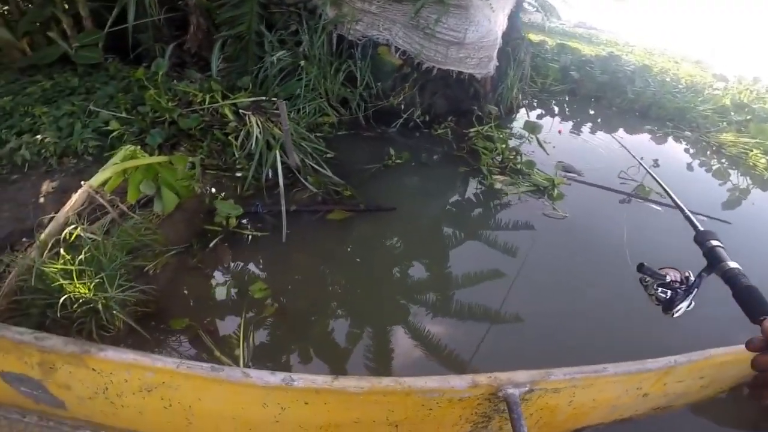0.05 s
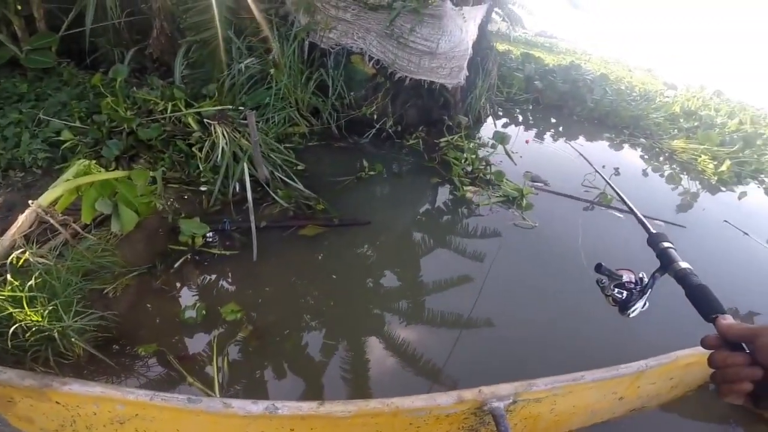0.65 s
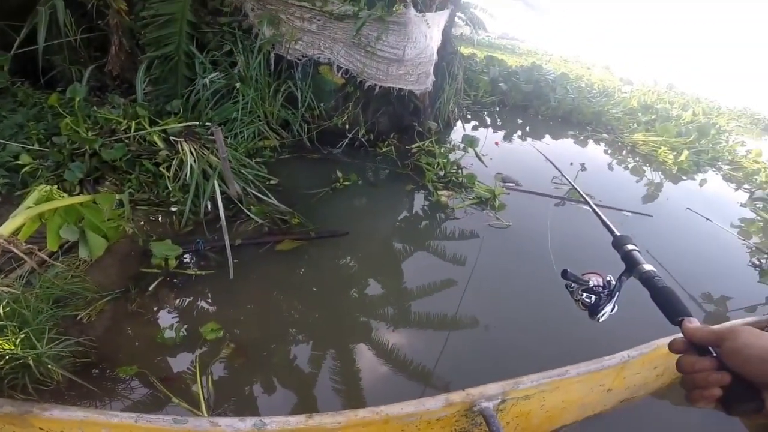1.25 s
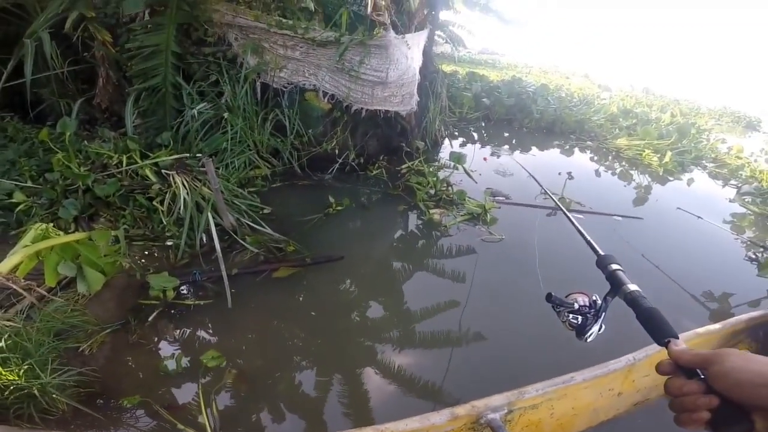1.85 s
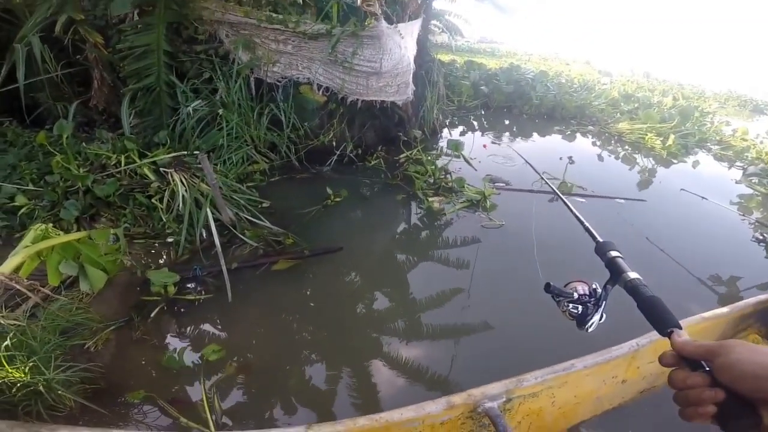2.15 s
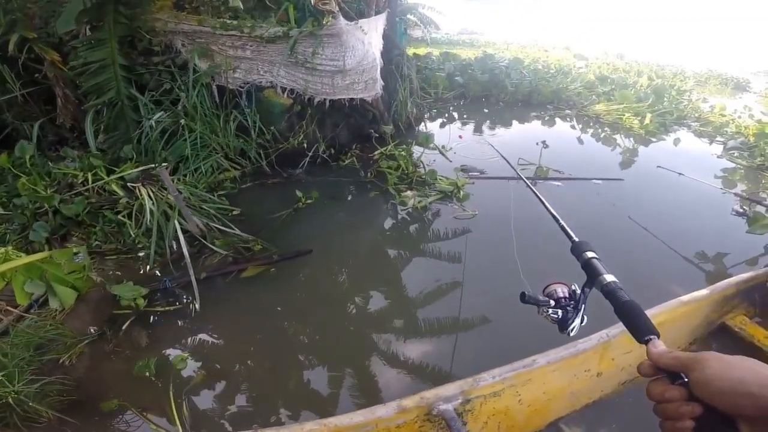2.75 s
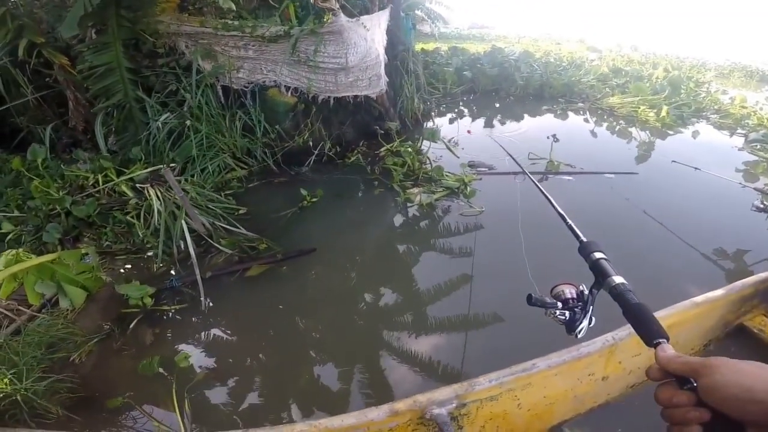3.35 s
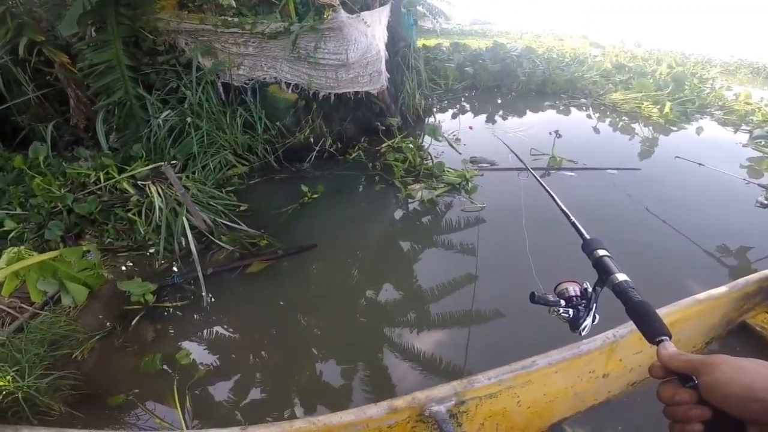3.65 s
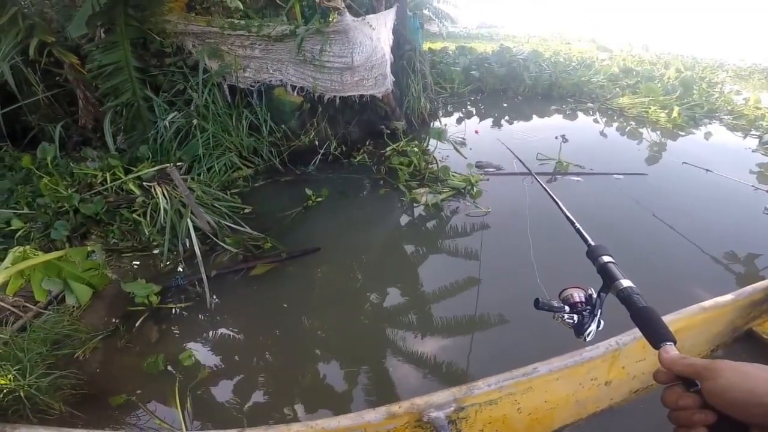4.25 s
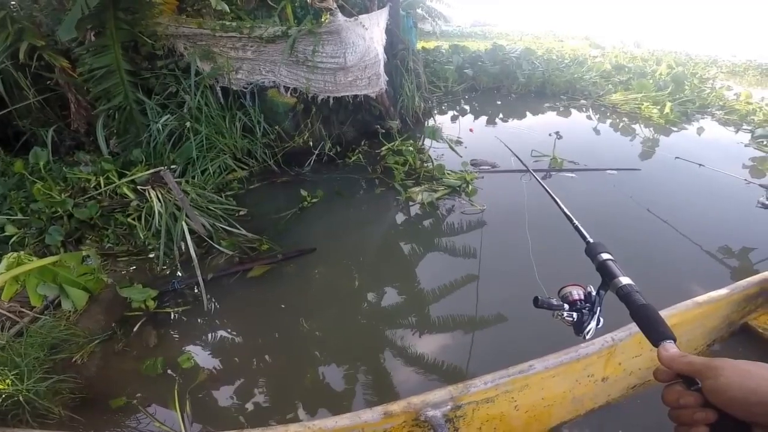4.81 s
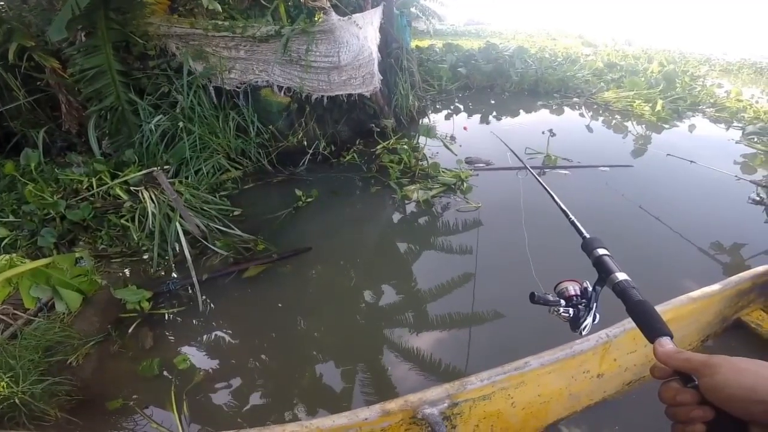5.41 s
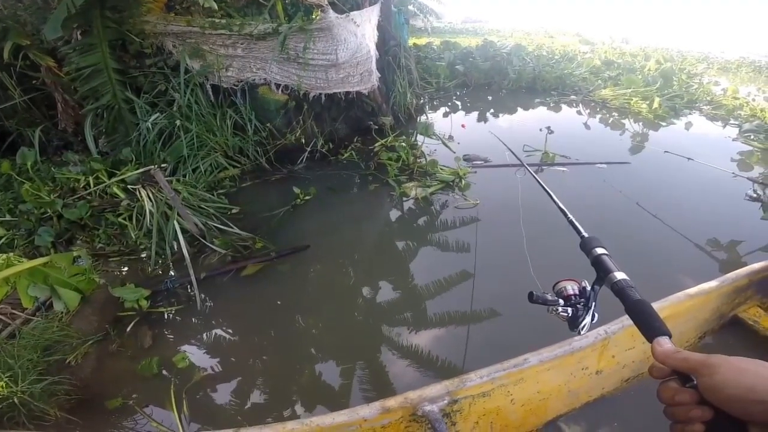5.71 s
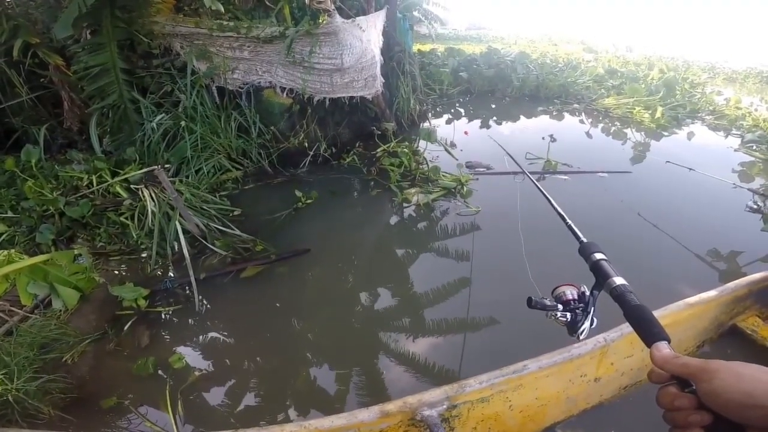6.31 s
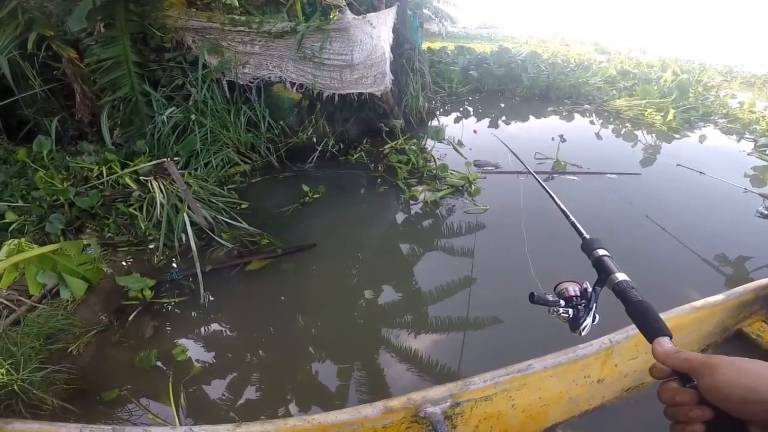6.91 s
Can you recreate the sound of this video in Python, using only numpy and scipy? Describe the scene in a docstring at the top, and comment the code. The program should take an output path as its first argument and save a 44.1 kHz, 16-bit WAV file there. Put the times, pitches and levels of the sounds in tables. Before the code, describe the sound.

A distant small engine chugs over still water, with soft close heartbeat-like thumps and two early knocks of fishing tackle.

```python
"""Distant engine from a canoe

A small engine chugs far off across still water: a throbbing exhaust hum, rough puffs, a light rattle.
Up close, soft paired thumps like a heartbeat come through the chest.
Near the start the fishing tackle knocks twice, then rubs and squeaks.
Behind it all lie a low hum, swells of rumble, open air, and a faint insect and bird in the reeds."""
import sys
import numpy as np
from scipy import signal
from scipy.fft import rfft, irfft
from scipy.io import wavfile
from scipy.ndimage import uniform_filter1d, map_coordinates

SR = 44100
rng = np.random.default_rng(int(sys.argv[2]) if len(sys.argv) > 2 else 0)


def store_pcm(level_fs):
    """Save levels as 16-bit WAV."""
    pcm = np.round(np.clip(level_fs, -1, 1) * 32767).astype(np.int16)
    wavfile.write(sys.argv[1], SR, np.atleast_2d(pcm).T)


N = 316197
T = np.arange(N) / SR

# engine firing rate: t/s, f/Hz
FIRING_RATE = [(0, 26.85), (.9, 26.75), (1.7, 26.92), (3.3, 26.88), (3.75, 26.75), (4.05, 26.85),
               (4.5, 26.72), (5.4, 26.93), (7.17, 26.87)]
# exhaust harmonics: multiple of the firing rate, level before/dB, level after/dB, halfway t/s
EXHAUST_ORDERS = [(4, -54, -38, 10), (5, -46.5, -71.5, 9.2), (6, -37, -32, 5.76), (7, -45, -46, 2.8),
                  (8, -51, -49, 3.4), (9, -43, -44.5, 3.8), (10, -43, -48.5, 5.1), (11, -47, -56.5, 5.2),
                  (12, -53, -57, 6.4), (13, -58, -51.5, 1.6), (14, -62, -56.5, 2.3), (15, -53.5, -50, 3.5),
                  (16, -57, -52.5, 1.6), (17, -60, -61.5, 3.6), (19, -55, -70.5, 5.55), (22, -68, -69, 8.2),
                  (35, -84, -69.5, 4), (38, -83, -83, 4), (39, -72, -73, 4), (44, -71.5, -75, 3.3),
                  (46, -70.5, -69, 4.6)]
# tone of the exhaust puffs: f/Hz, level/dB
PUFF_EQ = [(40, 3.5), (75, -4), (95, 1), (112, -2.5), (135, 1), (165, -1.5), (205, -13), (265, -11),
           (340, -29.5), (410, -29.5), (500, -22.5), (580, -41), (1200, -39.5), (3000, -49), (6000, -78)]
# tone of the slap that opens each throb: f/Hz, level/dB
SLAP_EQ = [(120, -11), (220, 3.5), (280, -2.5), (350, -4.5), (480, -11.5), (550, -21.5), (900, -50),
           (3000, -77)]
# resonances of the engine housing: f/Hz, width/Hz, level/dB
HOUSING_MODES = [(1046, 95, -75), (1683, 190, -63.5), (2125, 330, -64), (2730, 150, -77), (3010, 140, -72),
                 (3270, 400, -69.5)]
# fader ride on the housing rattle: t/s, level/dB
HOUSING_RIDE = [(0, 3.5), (.7, -0.5), (1.3, -1.5), (1.9, -1.5), (2.5, 2.5), (3, 0.5), (3.5, -0.5),
                (4.3, -1.5), (4.9, -2.5), (5.3, -0.5), (6.4, 0), (6.9, -1)]
# narrow metallic ring, as of a loose panel: f/Hz, width/Hz, relative level/dB
PANEL_MODES = [(1501, 36, -0.5), (1561, 63, 4), (1596, 52, -9)]
# fader ride on that ring: t/s, level/dB
PANEL_RIDE = [(0, -57), (.68, -56), (1.27, -63.5), (1.42, -57), (1.93, -62.5), (2.1, -57), (2.5, -61),
              (3.03, -56.5), (3.25, -62.5), (3.92, -57), (4.19, -65), (4.54, -53.5), (4.93, -62.5),
              (5.2, -56), (5.48, -60.5), (6.12, -62.5), (6.55, -65), (6.83, -57.5), (7.17, -61)]
# paired thumps: t/s, first level/dB, gap/s, second level/dB, second f/Hz
HEARTBEATS = [(0.417, -11.5, 0.17, -15, 41.2), (0.961, -9.5, 0.24, -16, 40.3), (1.547, -9, 0.24, -14, 46.3),
              (2.137, -7.5, 0.25, -14.5, 42), (2.718, -9.5, 0.26, -14.5, 48), (3.301, -11, 0.25, -14.5, 50),
              (3.875, -11.5, 0.23, -16.5, 48.5), (4.444, -15.5, 0.25, -14, 49.5),
              (5.05, -11, .243, -16.5, 53), (5.685, -12.5, 0.242, -17, 56.3), (6.367, -14, 0.23, -17, 50),
              (7.068, -13.5, .24, -30, 50)]
# chest-worn gear swaying against the body: t/s, level/dB, f/Hz
GEAR_SWAYS = [(0.091, -22.5, 5.6), (0.171, -10, 27.8), (0.226, -7, 29.6), (0.301, -14, 13.4),
              (0.37, -19, 35), (2.206, -14.5, 17.3), (2.268, -20.5, 31)]
# impacts within the tackle knocks: t/s, thud level/dB, thud f/Hz, crack level/dB, ring level/dB
TACKLE_HITS = [(0.113, -18.5, 196, -38, -64), (0.1808, -14.5, 293, -22, -32), (0.1833, -14, 340, -35, -41),
               (0.1901, -7, 152, -50, -28), (0.196, -8, 130, -35, -22), (0.633, -16.5, 141, -47, -42),
               (.958, -38, 200, -38, -45)]
# tone of a knock's crack: f/Hz, level/dB
CRACK_EQ = [(100, -8), (380, 13), (700, -5.5), (1500, -13.5), (3400, -15), (4200, -46), (8000, -43),
            (14000, -60)]
# resonances of struck or rubbed tackle: f/Hz, width/Hz, relative level/dB
TACKLE_MODES = [(1630, 330, 10), (1900, 220, -10), (3180, 340, -19), (4520, 400, -13), (6500, 900, -14.5),
                (7780, 500, -16)]
# dull brushes that swell and stop short: peak t/s, level/dB
TACKLE_BRUSHES = [(0.118, -39.5), (0.182, -28)]
# small ticks of the tackle: t/s, f/Hz, width/Hz, level/dB, decay/s
TACKLE_TICKS = [(0.112, 2700, 450, -44, 0.0067), (0.1799, 3200, 696, -34.5, 0.004),
                (0.1963, 3770, 2600, -47, 0.00098)]
# partials of the squeak: ratio to the pitch, relative level/dB
SQUEAK_PARTIALS = [(0.999, -7), (1.982, -25), (2.85, -26.5), (4.0, -29.5)]
# swells of low rumble: peak t/s, half length/s, f/Hz, width/Hz, level/dB
RUMBLE_SWELLS = [(3.2, 1, 143.8, 28, -37), (4.754, 0.38, 88.7, 20, -35)]
# tone of the open air and hiss: f/Hz, level/dB
AIR_EQ = [(12, -0.5), (45, -3.5), (130, -4.5), (230, -18), (450, -28), (650, -33.5), (1220, -38.5),
          (1380, -39), (1900, -40.5), (2500, -46.5), (3400, -46), (4000, -49), (5200, -51.5), (5900, -49.5),
          (11000, -49.5), (15000, -60)]
# bird notes: t/s, length/s, top f/Hz, level/dB
BIRD_NOTES = [(4.347, 0.13, 4710, -68), (5.99, 0.12, 4620, -65)]


def engine(throb_hz=23.9, depth=0.36, snap=0.28):
    """The chug: a throb a little slower than the firing pumps the exhaust and rattle over a rising drone."""
    firing_hz, = curves(FIRING_RATE)
    firings = np.cumsum(firing_hz) / SR + 0.0021 * drift(per_s=20)
    throbs = throb_hz * (T - 0.035) + 0.034 * drift(per_s=3)
    swell = 1 + depth * (np.cos(2 * np.pi * throbs) - snap * np.sin(4 * np.pi * throbs))
    drone_gain = amp(-38 + 2 * drift(per_s=5)) * np.sqrt(2 * T / T[-1])
    drone = drone_gain * np.cos(2 * np.pi * 4 * throbs)
    return exhaust_hum(firings, swell) + drone + exhaust_puffs(throbs) + clatter(firings, swell)


def exhaust_hum(firings, swell, waver_db=1.52, scatter_rad=0.79, wander_rad=0.34):
    """Harmonics of the firing, each sliding to a new level on its own path over the water."""
    hum = np.zeros(N)
    for order, *levels in EXHAUST_ORDERS:
        level = slide(*levels)
        if order == 6:  # the main boom dips once
            level -= 8 * np.exp(-((T - 4.52) / 0.37) ** 2)
        phase = 2 * np.pi * order * firings + np.pi / 2 * (order % 2)  # the offset gives two blows a cycle
        phase += scatter_rad * rng.standard_normal() + wander_rad * drift(per_s=5)
        unrest = min(1, 9 / order) ** 2  # the upper orders hold steadiest
        level += unrest * waver_db * drift(per_s=4.1)
        hum += np.sqrt(2) * amp(level) * np.cos(phase)
    bass = signal.sosfiltfilt(signal.butter(4, 200, fs=SR, output="sos"), hum)
    return bass * (1 + swell) / 2 + (hum - bass) * swell  # the bass throbs half as deep


def exhaust_puffs(throbs):
    """Each throb opens with a sharp slap, then a rough puff; both ease off midway."""
    rough = amp(-35) * colour(puffs(throbs + 0.09, decay_cycles=1, floor=1), PUFF_EQ)
    slaps = puffs(throbs + 0.3, decay_cycles=0.22, floor=0.03)
    slaps *= amp(1.5 * drift(per_s=23.9))  # no two slaps hit alike
    return (rough + amp(-43.5) * colour(slaps, SLAP_EQ)) * amp(slide(0.82, -3.7, halfway_s=4.2))


def clatter(firings, swell, follow=0.22):
    """The firings rattle the housing, which partly follows a metallic ring as it swells and sinks."""
    def shake(modes):
        """Each mode is rattled twice a firing and wavers on its own."""
        out = np.zeros(N)
        for hz, width, db in modes:
            gain = amp(db + 1.2 * drift(per_s=11))
            drive = puffs(2 * firings, decay_cycles=0.87, floor=0.82) * (4 + swell)
            out += gain * resonate(drive, [(hz, width, 0)])
        return out

    panel_db, = curves(PANEL_RIDE)
    housing_db, = curves(HOUSING_RIDE)
    housing = amp(housing_db + follow * (panel_db - panel_db.mean())) * shake(HOUSING_MODES)
    return housing + amp(panel_db) * unit(shake(PANEL_MODES))


def body(octaves_per_db=0.2369):
    """Heartbeat-like thumps and sways of gear at the chest, with a soft flutter of cloth under each."""
    thumps = np.zeros(N)
    for s, db, gap, second_db, second_hz in HEARTBEATS:
        first_hz = 32.2 * 2 ** (octaves_per_db * (db + 10.5))  # a stronger thump is quicker
        thumps += thump(s - 0.049, db - 13, hz=19, cycles=0.12)  # lead-in
        thumps += thump(s - 0.0223, db - 11.5, hz=66, cycles=0.75)  # quick catch
        thumps += thump(s, db - 1, first_hz, cycles=0.48)  # lub
        thumps += thump(s + 0.0493, db - 8, hz=18, cycles=0.39)  # rebound
        thumps += thump(s + gap, second_db + 5, second_hz, cycles=0.46, wave=np.sin, slowing=0.27)  # dub
    for s, db, hz in GEAR_SWAYS:
        thumps += thump(s, db, hz, cycles=1)
    pressure = np.sqrt(abs(uniform_filter1d(thumps ** 2, size=2000)))
    cloth = colour(noise(), [(20, 9.5), (85, 15.5), (140, -19), (300, -12), (900, -68)])
    return thumps + amp(-13) * pressure * cloth


def thump(s, db, hz, cycles, wave=np.cos, slowing=0):
    """A brief, uneven low push and its recoil, centred on time s; it may slow as it dies."""
    turns = (T - s + 0.0008 * drift(per_s=110)) * hz
    near = abs(turns) < 4
    turns = turns[near] * (1 - slowing * np.tanh(2 * turns[near]))
    envelope = np.cos(np.pi * turns / 8) / np.cosh(turns / cycles)
    out = np.zeros(N)
    out[near] = amp(db) * envelope * wave(2 * np.pi * turns)
    return out


def tackle(thud_s=0.0069, crack_s=0.0096, ring_s=0.0022, brush_rise_s=0.033, brush_fall_s=0.0039):
    """Each knock is a dead thud, a crack and a short ring; brushing and rubbing scrape the same modes."""
    crack_env = sum(amp(db) * np.exp(-np.maximum((s - T) / brush_rise_s, (T - s) / brush_fall_s))
                    for s, db in TACKLE_BRUSHES)
    rub_env, squeak = rub()
    ring_env = amp(-5) * rub_env + amp(-15) * crack_env
    thuds = -thump(s=0.198, db=-10, hz=84, cycles=0.6)  # the hardest knock also booms
    for s, thud_db, hz, crack_db, ring_db in TACKLE_HITS:
        age = np.maximum(T - s, 0)
        thuds -= amp(thud_db) * np.sin(2 * np.pi * hz * age) * np.exp(-age / thud_s)
        crack_env += amp(crack_db) * (age > 0) * np.exp(-age / crack_s)
        ring_env += amp(ring_db) * (age > 0) * np.exp(-age / ring_s)
    cracks, scrape = crack_env * noise(), ring_env * noise()
    ring = scrape.std() * resonate(scrape, TACKLE_MODES)
    return thuds + cracks.std() * colour(cracks, CRACK_EQ) + ring + squeak


def rub(start_s=0.178, rise_s=0.016, stop_s=0.31, release_s=0.055, squeak_hz=1635, fade_db_per_s=68):
    """Tackle sticks and slips: returns the rub's juddering envelope and its squeak, sagging in pitch."""
    age = np.maximum(T - start_s, 0)
    attack = np.minimum(age / rise_s, 1)
    release = np.exp(-np.maximum(T - stop_s, 0) / release_s)
    judder_db = 3 * np.tanh(drift(per_s=130))
    envelope = attack * amp(-32 - fade_db_per_s * age + judder_db) * release
    pitch = squeak_hz * (1 - 0.22 * np.minimum(age, 0.2) + 0.028 * drift(per_s=900))
    turns = np.cumsum(pitch) / SR
    tone = unit(sum(amp(db) * np.sin(2 * np.pi * ratio * turns) for ratio, db in SQUEAK_PARTIALS))
    return envelope, amp(-4) * envelope * tone


def ticks():
    """Small ticks of the tackle: bursts of noise, each in its own band."""
    out = np.zeros(N)
    for s, hz, width, db, decay_s in TACKLE_TICKS:
        burst = amp(db) * (T > s) * np.exp(-np.maximum(T - s, 0) / decay_s) * noise()
        out += burst.std() * resonate(burst, [(hz, width, 0)])
    return out


def far_hum(hz=128.14):
    """A second low hum that wanders in pitch and sinks back."""
    turns = np.cumsum(hz + 2.62 * drift(per_s=5)) / SR
    level = slide(-41.5, -49.5, halfway_s=5.6) + 3.1 * drift(per_s=4.22)
    return np.sqrt(2) * amp(level) * np.sin(2 * np.pi * turns)


def rumble():
    """Low rumble swells in one narrow band, then in another."""
    return sum(amp(db) * np.exp(-((T - s) / length) ** 2) * resonate(noise(), [(hz, width, 0)])
               for s, length, hz, width, db in RUMBLE_SWELLS)


def air():
    """A steady bed of open air and hiss."""
    return amp(-33) * colour(noise(), AIR_EQ)


def insect(hz=8580, width_hz=400, growth_db_per_s=0.75):
    """A thin, wavering trill that creeps up in level."""
    level = -80.5 + growth_db_per_s * T + 1.2 * drift(per_s=12)
    return amp(level) * resonate(noise(), [(hz, width_hz, 0)])


def bird():
    """Two far notes that flick up and slide down."""
    out = np.zeros(N)
    for s, length, hz, db in BIRD_NOTES:
        progress = np.clip((T - s) / length, 0, 1)
        arch = abs(np.sin(np.pi * progress ** 0.45))
        pitch = hz * (1 + 0.07 * (arch - 1) + 0.006 * drift(per_s=300))
        out += amp(db) * arch * np.sin(2 * np.pi * np.cumsum(pitch) / SR)
    return out


def amp(db):
    """Decibels to gain."""
    return 10 ** (np.asarray(db) / 20)


def unit(x):
    """Scales to rms 1."""
    return x / np.sqrt(np.mean(x ** 2) + 1e-20)


def curves(rows):
    """Each level or rate column of a table as a curve in time."""
    s, *columns = np.transpose(rows)
    return [np.interp(T, s, c) for c in columns]


def slide(before_db, after_db, halfway_s, ease_s=0.78):
    """A smooth fader move between two levels."""
    return before_db + (after_db - before_db) * (1 + np.tanh((T - halfway_s) / ease_s)) / 2


def noise():
    """White noise."""
    return rng.standard_normal(N)


def puffs(turns, decay_cycles, floor):
    """Noise that jumps at each whole turn and decays toward a steady floor."""
    return noise() * (floor + np.exp(-(turns % 1) / decay_cycles))


def drift(per_s):
    """Smooth random wander, at rms 1."""
    knots = rng.standard_normal(2000)
    wander = map_coordinates(knots, [T[::20] * per_s], order=3, mode="mirror")
    return np.interp(T, T[::20], unit(wander))


def colour(x, eq):
    """Shapes x with an EQ curve, at rms 1."""
    hz, db = np.transpose(eq)
    f = np.fft.rfftfreq(len(x), 1 / SR)
    gain = amp(np.interp(np.log(f + 1), np.log(hz), db))
    return unit(irfft(rfft(x) * gain, len(x)))


def resonate(x, modes):
    """Rings x through steep resonances, summed at rms 1."""
    out = 0
    for hz, width, db in modes:
        b, a = signal.iirpeak(hz, hz / width, SR)
        out = out + amp(db) * unit(signal.lfilter(b, a, signal.lfilter(b, a, x)))
    return unit(out)


def scene(left_db=-6.75, right_db=3.75):
    """All layers in one mono mix, panned right."""
    mono = engine() + body() + tackle() + ticks() + far_hum() + rumble() + air() + insect() + bird()
    return mono * amp([[left_db], [right_db]])


def record(dry, cutoff_hz=15450):
    """A hard limit at full scale, then a steep cut of the top end."""
    lowpass = signal.firwin(511, cutoff_hz, window=("kaiser", 9), fs=SR)
    return signal.oaconvolve(np.clip(dry, -1, 1), lowpass[None], "same")


dry = scene()
out = record(dry)
store_pcm(out)
```